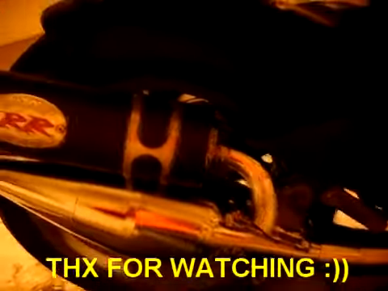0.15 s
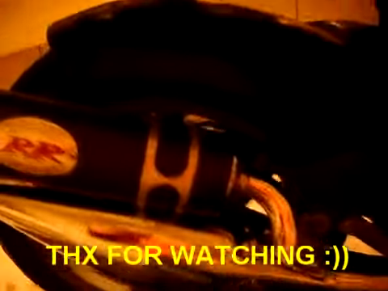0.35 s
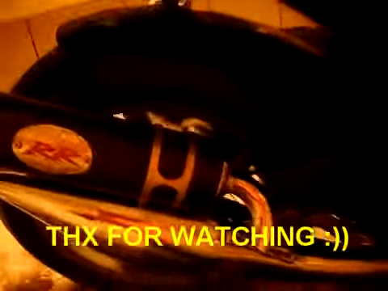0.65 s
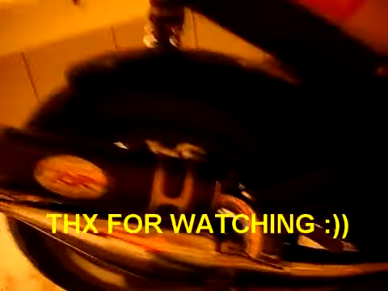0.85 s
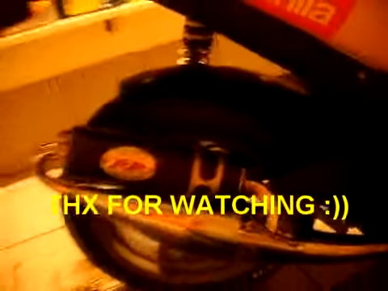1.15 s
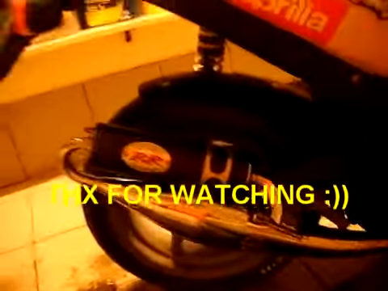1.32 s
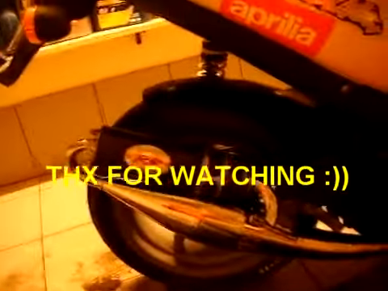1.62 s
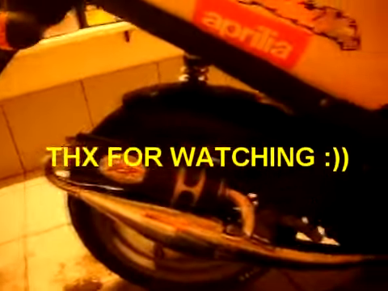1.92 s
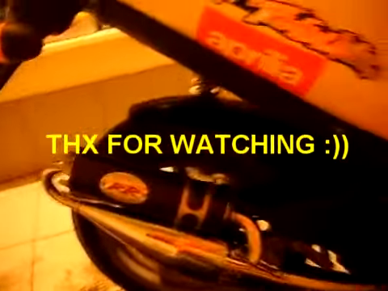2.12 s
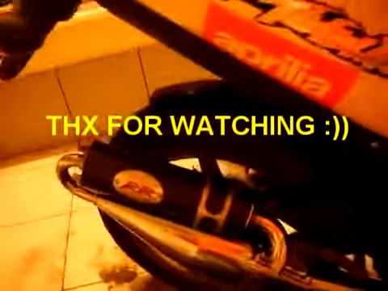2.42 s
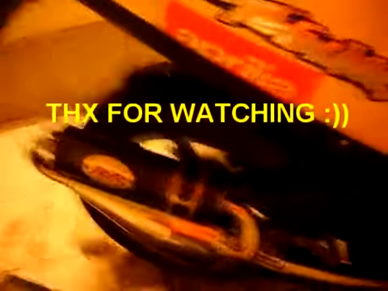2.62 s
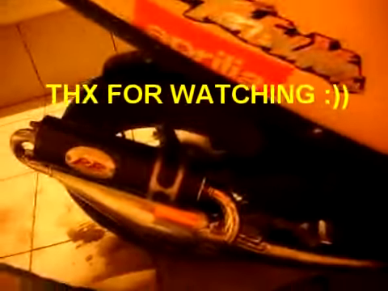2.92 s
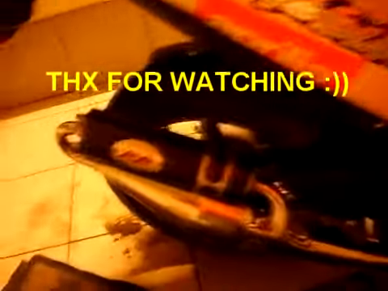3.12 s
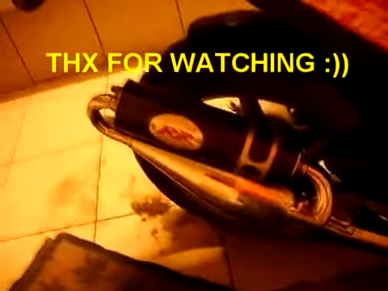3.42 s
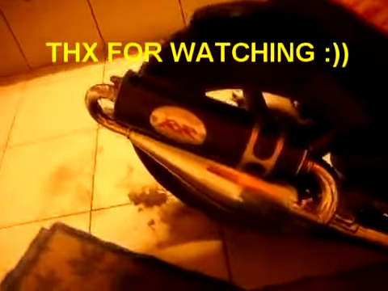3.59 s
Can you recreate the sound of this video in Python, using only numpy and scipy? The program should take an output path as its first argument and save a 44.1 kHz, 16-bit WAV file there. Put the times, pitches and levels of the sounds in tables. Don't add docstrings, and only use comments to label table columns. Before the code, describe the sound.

A small two-stroke scooter engine, very close: from 0 to 0.6 s fast, loud, boomy exhaust pops and a brief hum fall from a throttle blip. By about 1.2 s it slows to a softer lumpy idle, uneven thumps and weak puffs continuing to 3.7 s. Metallic clanks, ticks and hollow gas spits ride over a low roar; tiled walls echo the rattle, and the small microphone flattens loud pops.

```python
import sys
import numpy as np
from scipy import signal
from scipy.fft import rfft, irfft
from scipy.io import wavfile
from scipy.ndimage import uniform_filter1d

SR = 44100
rng = np.random.default_rng(int(sys.argv[2]) if len(sys.argv) > 2 else 0)


def materialize(psi):
    bounded = np.clip(np.atleast_2d(psi).T, -1, 1)
    quanta = np.round(bounded * 32767).astype(np.int16)
    wavfile.write(sys.argv[1], SR, quanta)


def elevation(decibels):
    levels = np.asarray(decibels, float)
    return 10 ** (levels / 20)


N = 165375

# start_s, level_db
FIRINGS = [(0.0697, -4), (0.1255, -2.5), (0.1778, -2), (0.2405, -9.7), (0.2935, 1), (0.3585, -2),
           (0.4169, 0.5), (0.486, -0.5), (0.5496, -6.5), (0.691, -5), (0.769, -6), (0.8411, -1.5),
           (0.9977, -6.6), (1.1671, -12), (1.3579, -12), (1.4571, -7.5), (1.6688, -4.5), (1.8101, -5),
           (2.0019, -6), (2.0981, -9.5), (2.244, -7), (2.3415, -9), (2.4908, -5.5), (2.6315, -7),
           (2.7709, -6), (3.0093, -4.5), (3.1529, -9.5), (3.2983, -9), (3.492, -4.5), (3.6398, -4)]
# start_s, peak_db
REED_SNAPS = [(0.0318, -50), (0.173, -45), (0.2526, -40), (0.2877, -35.5), (0.3411, -43), (0.405, -38.5),
              (0.4377, -42), (0.544, -47), (0.7252, -43.5), (0.8275, -42), (0.988, -50), (1.2075, -47),
              (1.3443, -49.5), (1.3924, -54), (1.541, -53), (1.7973, -52), (1.8384, -48), (1.891, -45),
              (2.1322, -56), (2.2737, -49), (2.5296, -47), (2.671, -42), (2.813, -43), (3.0505, -40.5),
              (3.1939, -42), (3.287, -55), (3.3397, -41.5)]
# start_s, peak_db
GAS_SPITS = [(0.0618, -18.5), (0.1161, -18), (0.167, -15), (0.2304, -19), (0.3301, -37), (0.4339, -30.5),
             (0.5122, -29), (0.5462, -32), (0.5806, -18), (0.6893, -29), (0.7297, -28), (0.8345, -23),
             (0.8759, -17), (0.9946, -31), (1.035, -27), (1.0829, -24.5), (1.2106, -25.5), (1.3902, -19.5),
             (1.4381, -16), (1.6062, -31), (1.6646, -18), (1.706, -22), (2.0058, -18), (2.0497, -27.5),
             (2.0787, -51), (2.146, -25), (2.2882, -18), (2.3221, -46), (2.4374, -22.5), (2.6374, -25),
             (2.7681, -20.5), (2.8125, -23), (2.9567, -24), (3.1482, -30.5), (3.1867, -20.5),
             (3.236, -32.5), (3.2979, -20.5), (3.3293, -23), (3.3842, -34), (3.5259, -17.5), (3.6386, -36),
             (3.6855, -30)]


def add(mix, s, sound):
    at = round(s * SR)
    part = mix[max(at, 0):][:len(sound) + min(at, 0)]
    part += sound[max(-at, 0):][:len(part)]


def evened(x):
    return x / np.sqrt(np.mean(x ** 2) + 1e-20)


def ring(modes, seconds):
    t = np.arange(round(seconds * SR)) / SR
    return sum(elevation(db - 60 * t / t60) * np.sin(2 * np.pi * hz * t) for hz, db, t60 in modes)


def burst(modes, rise_s):
    detune, spread_db = 0.012, 2.5
    varied = []
    for hz, db, t60 in modes:
        pitch, force = rng.standard_normal(2)
        varied.append((hz * (1 + detune * pitch), db + spread_db * force, t60))
    sound = ring(varied, 0.06)
    rise = np.minimum(np.arange(len(sound)) / SR / rise_s, 1) ** 2
    sound = sound * rise
    return sound / abs(sound).max()


def load_db(t):
    # time_s, level_db
    load_curve = [(0, -20), (.15, -21.5), (.3, -21.5), (.45, -22.5), (.6, -22), (.8, -25), (1.0, -24),
                  (1.3, -28), (1.43, -27), (1.55, -28), (1.9, -26.5), (2.2, -27), (2.5, -25.5),
                  (2.75, -27.5), (3.0, -26.5), (3.3, -30), (3.47, -26.5), (3.75, -26)]
    time_s, level_db = np.transpose(load_curve)
    return np.interp(t, time_s, level_db)


def crank():
    turns_between = [2, 2, 2, 2, 2, 2, 2, 2, 4, 2, 2, 4, 4, 4, 2, 4, 3, 4, 2, 3, 2, 3, 3, 3, 5, 3, 3, 4, 3]
    first_turn_s, last_turn_s = 0.03, 0.049
    s = np.array(FIRINGS)[:, 0]
    turn = np.cumsum([0] + turns_between)
    all_turns = np.r_[-4, turn, turn[-1] + 4]
    all_times = np.r_[s[0] - 4 * first_turn_s, s, s[-1] + 4 * last_turn_s]
    return all_turns, all_times


def exhaust():
    # pitch_hz, level_db, t60_s
    pipe_modes = [(71.3, -24, 1), (110.5, -1, 0.3), (132.5, 0, 0.26), (161, -14, 0.3), (203.3, -25, 0.1),
                  (250.7, -10, .4), (308, -19.5, 0.053), (338, -15, .25), (408, -21, .12),
                  (541.5, -14, 0.28), (717, -19, .25), (800, -14.5, .1)]
    # pitch_hz, level_db, t60_s
    blast_modes = [
        (155.4, 0, 0.077),
        (45, -9, 0.1),
        (290, -11, .03),
    ]
    # start_s, level_db
    half_firings = [(0.0061, -6.5), (0.0377, -8), (0.0943, -3), (0.1423, -10), (0.2052, -1), (0.263, -12),
                    (0.3226, -15.5), (0.3857, -3), (0.4485, -23), (0.5146, -3), (0.5823, -1.5),
                    (0.6157, -8.5), (0.6557, -4.5), (0.7261, -3), (0.8018, -8.5), (0.8775, -4.5),
                    (0.9153, -9.5), (0.9561, -6), (1.0368, -9), (1.075, -30), (1.123, -5.5), (1.212, -8.5),
                    (1.2634, -13.5), (1.3096, -11.5), (1.4084, -5), (1.5085, -10), (1.564, -8),
                    (1.6103, -9), (1.7091, -7), (1.761, -19.2), (1.8562, -16.5), (1.9037, -22),
                    (1.9517, -5.5), (2.0486, -9), (2.1472, -15.5), (2.194, -8.5), (2.292, -8.5),
                    (2.3868, -6.5), (2.441, -9.5), (2.5345, -26), (2.5824, -12), (2.6728, -16.5),
                    (2.721, -8.5), (2.815, -13.5), (2.8612, -12.5), (2.9064, -14.0), (2.9589, -9),
                    (3.055, -13), (3.105, -14), (3.1983, -6), (3.242, -27.5), (3.3441, -9), (3.3958, -18),
                    (3.4428, -12), (3.538, -7), (3.589, -17.5), (3.6855, -17.5), (3.733, -14.5)]
    pop_lead_s, pop_soft_s, puff_s = 0.0025, 0.0012, 0.0039
    pipe = ring(pipe_modes, 0.5)
    blast = ring(blast_modes, 0.5) + elevation(-2) * pipe
    pop = -np.convolve(blast, np.hanning(round(2 * pop_soft_s * SR) + 3))
    puff = -np.convolve(pipe, np.hanning(round(puff_s * SR) + 3))
    out = np.zeros(N)
    for s, db in FIRINGS:
        add(out, s - pop_lead_s - pop_soft_s, elevation(db) * pop / abs(pop).max())
    for s, db in half_firings:
        add(out, s, elevation(db) * puff / abs(puff).max())
    hz = np.fft.rfftfreq(N, 1 / SR)
    node_hz, node_width_hz, node_depth = 88, 14, 0.8
    node = 1 - node_depth / (1 + (2 * (hz - node_hz) / node_width_hz) ** 2)
    bass = (hz / 52) ** 2
    return irfft(rfft(out) * node * bass / (1 + bass), N)


def clatter(body, angle, scatter, db, spread_db, rise_s):
    turn, s = crank()
    out = np.zeros(N)
    for k in np.arange(turn[0], turn[-1]):
        late, force = rng.standard_normal(2)
        at = np.interp(k + angle + scatter * late, turn, s)
        level_db = db + load_db(at) + spread_db * force
        add(out, at, elevation(level_db) * burst(body, rise_s))
    return out


def knocks(events, body, db, rise_s):
    out = np.zeros(N)
    for s, peak_db in events:
        add(out, s - rise_s / 2, elevation(peak_db + db) * burst(body, rise_s))
    return out


def piston_slaps():
    # pitch_hz, level_db, t60_s
    slap_body = [
        (1300, -15, 0.14),
        (2252, -2.5, 0.026),
        (2545, -4.5, 0.075),
        (2620, 2, 0.044),
        (2940, -11, 0.015),
        (2930, -2, 0.044),
        (3036, -8.5, 0.058),
        (8450, -34, 0.03),
    ]
    # start_s, peak_db
    big_slaps = [(0.064, -34), (0.1394, -37.5), (0.171, -29.5), (0.282, -35), (0.376, -34), (0.411, -28),
                 (0.466, -32), (0.5053, -37), (0.678, -28.5), (0.829, -26), (0.942, -40), (0.9822, -27.5),
                 (1.1084, -33.5), (1.2445, -26), (1.3434, -30), (1.3958, -31), (1.74, -30.5),
                 (1.7975, -22.5), (1.889, -28.5), (2.226, -27), (2.3252, -30), (2.5333, -33.5),
                 (2.9984, -25.5), (3.0826, -26.5), (3.1812, -29), (3.2272, -29.5), (3.2825, -27),
                 (3.3434, -28), (3.476, -29), (3.5223, -28.5), (3.578, -25.5), (3.6274, -25), (3.673, -33),
                 (3.718, -25)]
    every_turn = clatter(slap_body, angle=0.72, scatter=0.035, db=-11, spread_db=2.5, rise_s=0.0015)
    return every_turn + knocks(big_slaps, slap_body, db=-2, rise_s=0.007)


def reed_valve():
    # pitch_hz, level_db, t60_s
    reed_body = [
        (1290, 4.5, 0.039),
        (3100, -1.5, .02),
        (4350, -4.5, 0.016),
        (6100, -19.5, 0.032),
        (8000, -25, .02),
    ]
    # pitch_hz, level_db, t60_s
    snap_body = [
        (3150, 2, .02),
        (3750, -1, .014),
        (4600, 0, .022),
        (5200, -7, .012),
        (6350, -12, .018),
        (7200, -20, .012),
        (8000, -23, .015),
    ]
    every_turn = clatter(reed_body, angle=0.93, scatter=0.015, db=-25, spread_db=2.5, rise_s=0.0012)
    return every_turn + knocks(REED_SNAPS, snap_body, db=6.5, rise_s=0.0012)


def ring_ticks():
    # pitch_hz, level_db, t60_s
    rings_body = [
        (4950, 0, .018),
        (6080, -7, .016),
    ]
    # start_s, peak_db
    big_ticks = [(1.034, -44), (1.2087, -45), (1.3912, -46), (1.7973, -45), (2.1535, -46), (2.2508, -47),
                 (2.3501, -49), (2.3994, -44), (2.4972, -45), (2.6718, -47), (2.7786, -48), (2.8704, -48),
                 (2.9163, -47), (3.1592, -44), (3.2555, -47), (3.3049, -44), (3.4002, -48), (3.4999, -48)]
    every_turn = clatter(rings_body, angle=0.19, scatter=0.01, db=-29, spread_db=2.5, rise_s=0.0059)
    return every_turn + knocks(big_ticks, rings_body, db=1, rise_s=0.0027)


def gas_spits():
    # pitch_hz, level_db, t60_s
    spit_body = [
        (736, -5, 0.15),
        (999, 1.5, 0.022),
        (1327, 6, 0.02),
        (1530, -5, 0.022),
        (1867, -13, 0.027),
    ]
    return knocks(GAS_SPITS, spit_body, db=-2, rise_s=0.002)


def drones():
    # start_s, length_s, pitch_hz, level_db
    sung_notes = [
        (.9, 2.95, 72, -32),
        (-.1, .85, 535, -34),
        (-.1, .46, 682, -28),
        (.4, .17, 254, -18),
        (1.36, .11, 410, -33),
        (1.0, 2.8, 664, -38),
        (1.1, 1.7, 249, -35),
        (2.85, .7, 250, -28),
        (2.2, 1.6, 335, -33),
    ]
    width_hz = 4
    out = np.zeros(N)
    for start, length, hz, db in sung_notes:
        t = np.arange(round(length * SR)) / SR
        wander = np.cumsum(rng.standard_normal(N))[:len(t)]
        drift = uniform_filter1d(wander, size=400) * np.sqrt(2 * np.pi * width_hz / SR)
        swell = np.minimum(3 * np.sin(np.pi * t / length), 1)
        add(out, start, elevation(db + 2) * swell * np.sin(2 * np.pi * hz * t + drift))
    return out


def roar():
    # pitch_hz, level_db (per Hz)
    roar_colour = [
        (200, -4.5),
        (343, -16),
        (484, -24),
        (1250, -32),
        (2070, -41.5),
        (3500, -46.5),
        (6500, -66),
        (8600, -78.5),
    ]
    # pitch_hz, width_hz, lift_db
    casing_modes = [(246, 2.2, -3), (342.5, 25, 2.5), (657.6, 60, 9), (1198, 248, 6.5), (1765, 29, 7),
                    (2490, 290, 5.5), (2853, 420, 7), (4740, 490, 4.5), (5560, 270, -3.5), (6030, 360, 1.5),
                    (8300, 580, 2.5)]
    a, b, patches = rng.standard_normal((N // 256 + 5, 513, 3)).T
    patches = evened(uniform_filter1d(uniform_filter1d(patches, 8, 0), 8, 1))
    spectrum = (a + 1j * b) * elevation(1.5 * patches)
    noise = signal.istft(spectrum, nperseg=1024, noverlap=768)[1][:N]

    hz = np.fft.rfftfreq(N, 1 / SR)
    pitch_hz, level_db = np.transpose(roar_colour)
    colour = elevation(np.interp(np.log(hz + 1), np.log(pitch_hz), level_db))
    colour /= 1 + (200 / (hz + 1)) ** 6
    lift = 1
    for mode_hz, width_hz, lift_db in casing_modes:
        lift = lift + (elevation(lift_db) - 1) / (1 + (2 * (hz - mode_hz) / width_hz) ** 2)
    colour *= lift

    turn, s = crank()
    t = np.arange(N) / SR
    angle = np.interp(t, s, turn)
    rush_at, spit_at, spit_turns = 0.83, 0.9, 0.15
    every = np.arange(turn[0] - 1, turn[-1] + 1)
    uneven_db = np.interp(angle - rush_at, every, rng.standard_normal(len(every)))
    swell_db = np.cos(2 * np.pi * (angle - rush_at)) + uneven_db
    swell_db += 3 * np.exp(-((angle - spit_at) % 1) / spit_turns)
    for at, _ in REED_SNAPS + GAS_SPITS:
        add(swell_db, at, 3.5 * np.exp(-t[:2000] / 0.012))
    swell_db = uniform_filter1d(uniform_filter1d(swell_db, size=90), size=90)
    return elevation(-1.5 + load_db(t) + swell_db) * evened(irfft(rfft(noise) * colour, N))


def rumble():
    hz = np.fft.rfftfreq(N, 1 / SR)
    colour = hz / (hz + 12) / (1 + (hz / 38) ** 6)
    low = irfft(rfft(rng.standard_normal(N)) * colour, N)
    near_db = load_db(np.arange(N) / SR)
    return elevation(-38 + near_db - near_db.mean()) * evened(low)


def garage(x):
    t = np.arange(SR // 2) / SR
    first_echo_s, t60_s = 0.006, 0.3
    tail = rng.standard_normal(len(t)) * (t > first_echo_s) * elevation(-60 * t / t60_s)
    return signal.fftconvolve(x, tail / np.linalg.norm(tail))[:N]


def scene():
    metal = piston_slaps() + reed_valve() + ring_ticks() + gas_spits()
    engine = exhaust() + drones() + roar() + rumble()
    return (engine + metal + elevation(-9) * garage(metal))[None]


def band_limit(x):
    return signal.sosfilt(signal.butter(12, 10380, fs=SR, output="sos"), x)


def record(dry):
    limit, edge_hz, offset, hiss_db = 0.51, 8700, 0.003, -92
    flattened = dry / (1 + (abs(dry) / limit) ** 6) ** (1 / 6)
    low_pass = signal.firwin(401, edge_hz, window=("kaiser", 2.5), fs=SR)
    narrow = signal.oaconvolve(flattened, low_pass[None], "same")
    hiss = elevation(hiss_db) * rng.standard_normal(dry.shape)
    return band_limit(narrow + offset + hiss)


dry = scene()
out = record(dry)
materialize(out)
```